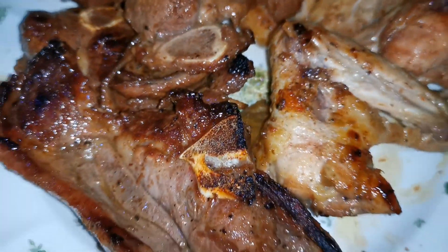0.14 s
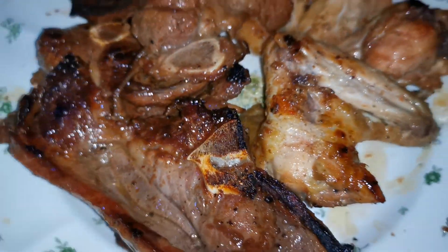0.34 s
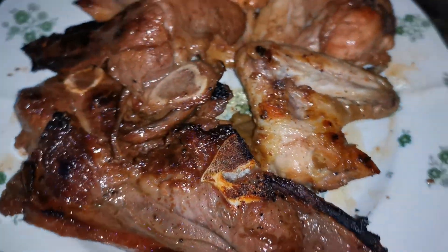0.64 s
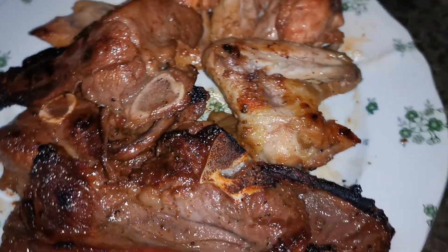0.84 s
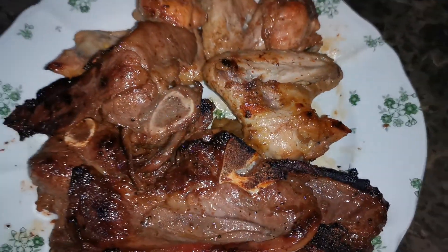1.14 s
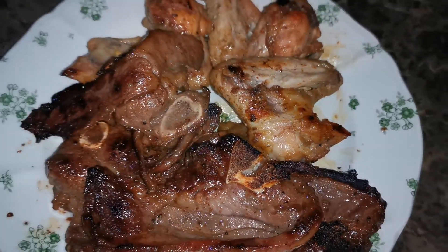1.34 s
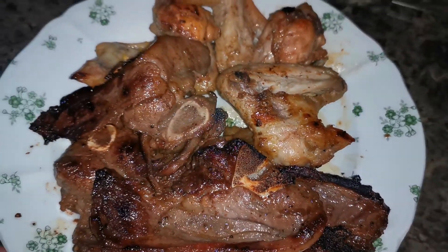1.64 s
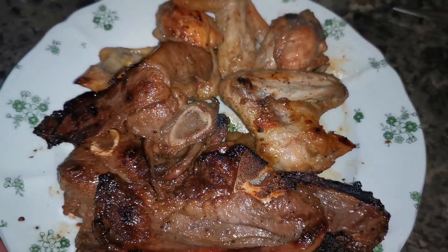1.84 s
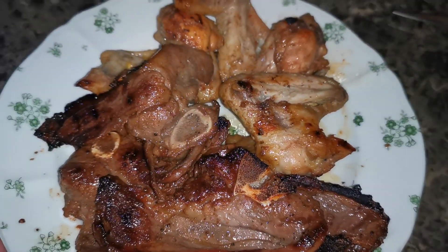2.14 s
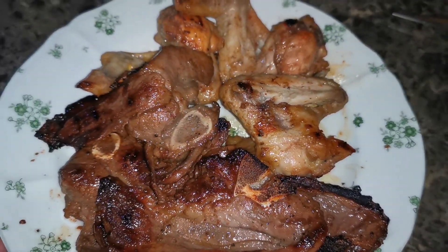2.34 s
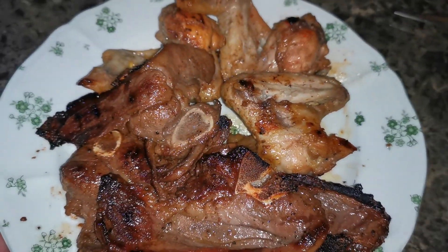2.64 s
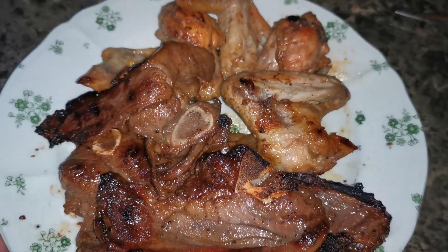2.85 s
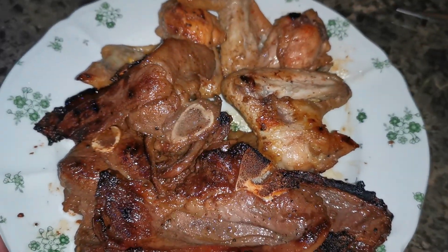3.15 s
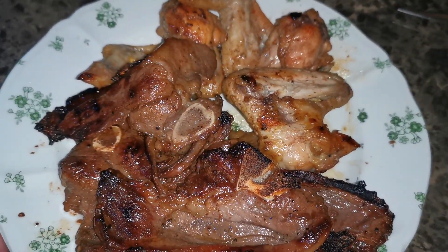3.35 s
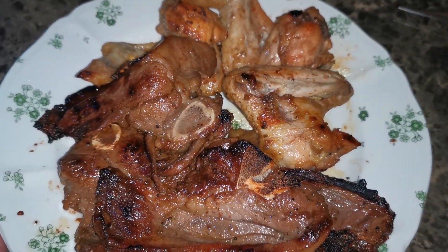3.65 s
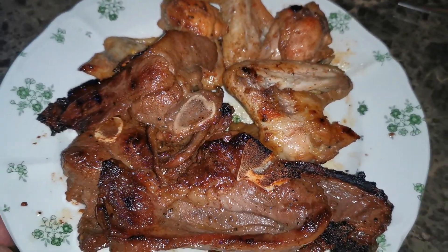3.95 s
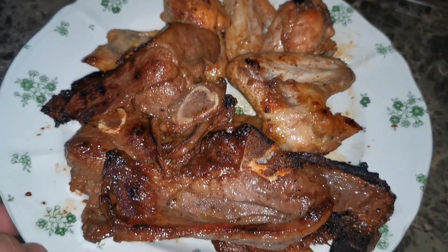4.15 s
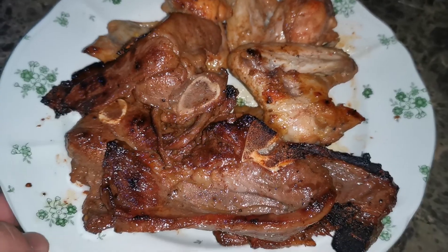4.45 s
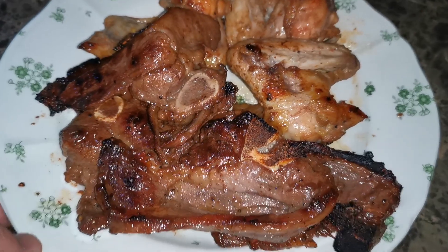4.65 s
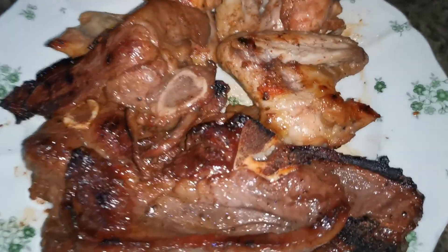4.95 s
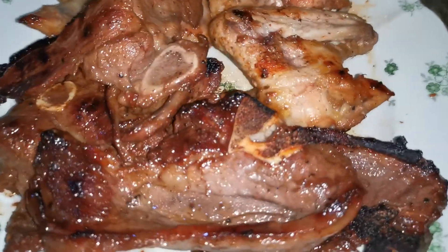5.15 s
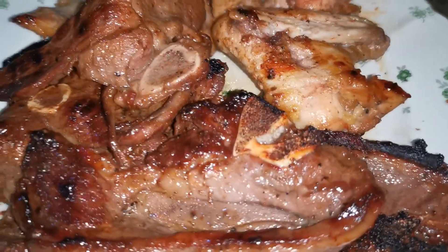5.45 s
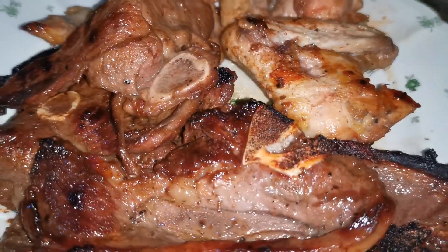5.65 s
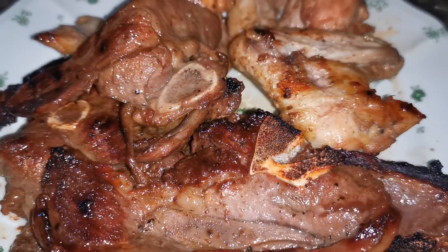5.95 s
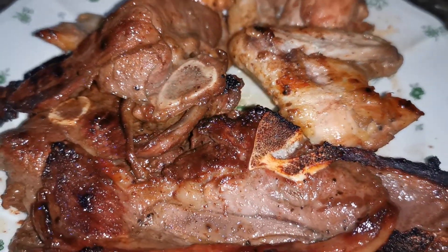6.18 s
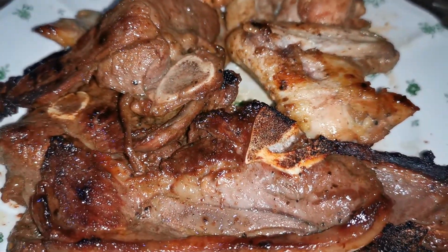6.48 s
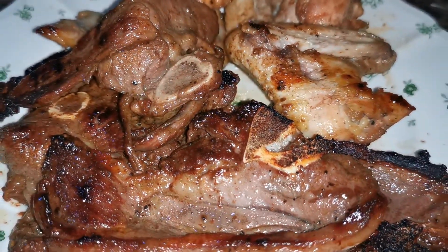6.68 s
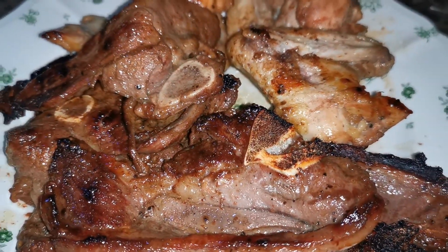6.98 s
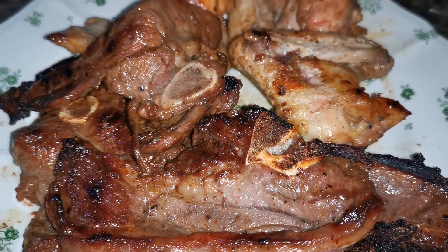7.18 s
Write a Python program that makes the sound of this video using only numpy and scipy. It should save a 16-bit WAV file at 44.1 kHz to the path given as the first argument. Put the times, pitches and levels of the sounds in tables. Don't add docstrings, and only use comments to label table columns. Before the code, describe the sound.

A low, steady fan-motor hum fills a hard kitchen from start to finish, fluttering about thirteen times a second. Underneath, the housing rumbles; above it, moving air rustles, with a faint wavering whistle at the start and again near 2.3 and 3.8 seconds. Hot fat gives a thin, quiet hiss that gradually fades, its brightest part first. Small dry spits tick from the beginning, with a clear one at 1.2 seconds and a roomier pop at 1.8. A little cluster follows around 2.5, then the strongest snap at 3.1, and more crisp ticks from 3.9 to 4.5. After 5 seconds only a few faint ticks remain. The handheld stereo microphone draws back in the first second, then moves close to the plate around 5.4, slightly recolouring the air noise, and stays there until the end at about 7.3 seconds, hum continuing.

```python
import sys
import numpy as np
from scipy import signal
from scipy.fft import rfft, irfft, next_fast_len
from scipy.io import wavfile
from scipy.ndimage import uniform_filter1d

SR = 44100
rng = np.random.default_rng(int(sys.argv[2]) if len(sys.argv) > 2 else 0)


def materialize(psi):
    bounded = np.clip(np.atleast_2d(psi).T, -1, 1)
    quanta = np.round(bounded * 32767).astype(np.int16)
    wavfile.write(sys.argv[1], SR, quanta)


def elevation(decibels):
    levels = np.asarray(decibels, float)
    return 10 ** (levels / 20)


N = 322791
T = np.arange(N) / SR
GRID = next_fast_len(N + 8192)
HZ = np.maximum(np.arange(GRID // 2 + 1) * SR / GRID, 1)
RIGHT_LAG_S = 0.00046
TOP_HZ = 15750

# (pitch_hz, left_db_per_hz, right_db_per_hz)
PORT_COLOUR = [(3220, -103, -91), (4290, -106, -93.5), (4740, -106, -100), (5940, -111, -103),
               (6760, -111, -98), (7900, -110, -99), (8100, -109, -106), (10000, -103, -110),
               (10340, -103, -113), (10500, -100, -108), (11400, -104, -104), (12600, -108, -99),
               (14000, -108, -101), (17200, -112, -116)]


def at_hz(rows):
    hz, *columns = np.transpose(rows)
    return np.array([np.interp(np.log(HZ), np.log(hz), column) for column in columns])


def band(spectra, low_hz, high_hz):
    return spectra * (HZ >= low_hz) * (HZ < high_hz)


def to_sound(spectra):
    return irfft(spectra, GRID)[:, :N]


def drift(rate_hz):
    draws = rng.standard_normal(int(N / SR * 40) + 40)
    memory = np.exp(-2 * np.pi * rate_hz / 40)
    slow = signal.lfilter([1], [1, -memory], draws)[38:]
    return np.interp(T * 40, np.arange(len(slow)), slow / slow.std())


def bump(middle_s, length_s):
    return np.cos(np.pi / 2 * np.clip((T - middle_s) / length_s, -1, 1)) ** 2


def port_noise():
    # (pitch_hz, likeness 0-1)
    likeness = [(25, 0.5), (100, 1), (300, 0.94), (600, 0.52), (900, 0.27), (2000, 0.82), (3000, 0.37),
                (8000, 0.02), (15000, 0)]
    shared, left, right = rfft(rng.standard_normal((3, GRID))) * np.sqrt(SR / 2)
    alike = np.clip(at_hz(likeness)[0], 0, 1)
    lagging_hz = np.maximum(HZ - 600, 0)
    late = np.exp(-2j * np.pi * lagging_hz * RIGHT_LAG_S)
    shared_pair = shared * [np.ones_like(late), late]
    return np.sqrt(alike) * shared_pair + np.sqrt(1 - alike) * np.array([left, right])


def hum():
    # (time_s, level_db)
    hum_levels = [(0.0, -33.5), (0.06, -31), (1.85, -32.5), (2.02, -30.5), (2.28, -31.5), (3.57, -32.5),
                  (3.69, -30.5), (4.06, -31.5), (4.14, -32.5), (6.38, -31.5), (6.73, -33), (6.83, -31.5),
                  (7.26, -32.5), (7.32, -37)]
    # (pitch_hz, level_db)
    motor_tones = [
        (41.48, -67),
        (48.6, -62),
        (52.1, -69),
        (104.04, -56),
        (300.1, -71),
    ]
    hum_hz, rotor_hz = 100.03, 13.01
    swell, sway = 0.125, 0.5
    balance_db = -0.9
    t = T - [[0.000195], [0]]
    turn = 2 * np.pi * rotor_hz * t + 1.8
    cycle = 2 * np.pi * hum_hz * t
    tone = (1 + swell * np.cos(turn)) * np.cos(cycle)
    tone = tone - sway * np.cos(turn + 0.65) * np.sin(cycle)
    strength_db = np.interp(T, *np.transpose(hum_levels))
    tone = elevation(uniform_filter1d(strength_db, size=SR // 12)) * tone
    for pitch_hz, level_db in motor_tones:
        wavering = elevation(level_db + 0.39 * drift(0.34))
        tone = tone + wavering * np.sin(2 * np.pi * pitch_hz * t)
    return np.sqrt(2) * tone * elevation([[balance_db / 2], [-balance_db / 2]])


def spits():
    # (start_s, peak_db, strongest_hz, fall_db_per_octave)
    near_spits = [(.168, -38, 14500, 8), (.187, -37, 14000, 18), (0.327, -31.5, 10000, 17),
                  (.6818, -39, 10000, 20), (.7557, -45, 12700, 18), (.8051, -42, 13000, 22),
                  (.9676, -29.5, 9500, 16.5), (1.1518, -51, 9700, 1), (1.2314, -23, 13300, 15.5),
                  (2.423, -36, 13500, 12.5), (2.499, -34.5, 10000, 11), (2.5593, -36.5, 8900, 17),
                  (3.0696, -39, 10000, 12), (3.105, -17.5, 10400, 24), (3.3716, -38, 14100, 22),
                  (3.4012, -35, 13700, 17), (3.94, -29.5, 7240, 12), (4.2467, -45, 14500, 9),
                  (4.3723, -25.5, 8250, 14), (4.372, -37.5, 3300, 13), (4.455, -36.5, 9200, 13),
                  (4.996, -40.5, 14000, 5), (3.1043, -17.5, 7940, 46), (3.106, -27.5, 5560, 40),
                  (3.911, -42, 3500, 10), (5.965, -46, 4000, 23)]
    # (start_s, peak_db, strongest_hz, fall_db_per_octave)
    far_spits = [(0.555, -42, 11000, 10), (.652, -36.5, 9800, 25), (1.0363, -41.5, 14700, 23),
                 (1.8084, -24.5, 8660, 59), (1.809, -35.5, 11300, 23), (1.8093, -33.5, 3000, 36),
                 (1.81, -40, 5400, 45), (1.9095, -43, 13000, 6), (5.963, -52, 9000, 4.5),
                 (6.0711, -50, 12600, 15), (6.403, -51, 13000, 7), (3.14, -40.5, 9500, 10),
                 (3.32, -48, 10000, 2.5), (3.535, -44.5, 13000, 7), (3.6916, -46.5, 11100, 7.5),
                 (3.9097, -37, 7300, 12.5), (4.415, -42, 9250, 11), (5.5235, -39.5, 13000, 7),
                 (6.534, -53, 10400, 8)]
    near_tail_db, far_tail_db = -16.5, -5.5
    rise_s, burst_s, gather_s = 0.001, 0.0017, 0.0009
    room_t60_s, treble_t60_s = 0.39, 0.25
    length, lag = 16384, round(RIGHT_LAG_S * SR)
    t = np.arange(length) / SR
    out = np.zeros((2, N + length + lag))
    hz = np.maximum(np.arange(length // 2 + 1) * SR / length, 1)
    ports = elevation([np.interp(hz, HZ, side) + 101.9 for side in at_hz(PORT_COLOUR)]) * (hz < TOP_HZ)
    treble = np.clip(np.log2(hz / 7000), 0, 1)
    early_echo = elevation(-3) * np.exp(-2j * np.pi * hz * 0.0029)
    gather = 1 - np.exp(-t / gather_s)
    burst_shape = (1 - np.exp(-t / rise_s)) * np.exp(-t / burst_s)
    fade_out = np.clip(4 - 4 * t / t[-1], 0, 1) ** 2

    rows = [(*row, near_tail_db) for row in near_spits] + [(*row, far_tail_db) for row in far_spits]
    for start_s, peak_db, strongest_hz, fall_db, tail_db in rows:
        octaves = np.log2(hz / strongest_hz)
        colour = elevation(fall_db * np.minimum(octaves, -1.36 * octaves) + 8.5)
        burst = irfft(rfft(rng.standard_normal(length)) * colour)
        burst = rfft(burst * burst_shape)
        spread_db = 2.5 * np.minimum(rng.exponential(1, (2, length)), 4)
        echoes = rng.standard_normal((2, length)) * elevation(spread_db - 21) * gather
        room = rfft(echoes * elevation(-60 * t / room_t60_s)) * (1 - treble)
        room = room + rfft(echoes * elevation(-60 * t / treble_t60_s)) * treble
        tail = elevation(tail_db + 12) * colour * room
        pop = elevation(peak_db) * irfft(ports * (burst * (1 + early_echo) + tail)) * fade_out
        i = round(start_s * SR)
        out[0, i:i + length] += pop[0]
        out[1, i + lag:i + lag + length] += pop[1]
    return out[:, :N]


def hiss(noise):
    split_hz = 6500
    low_db = 0.23 - 0.43 * T
    high_db = 0.6 - 0.8 * T
    spectra = band(noise, 3200, TOP_HZ) * elevation(at_hz(PORT_COLOUR))
    low = to_sound(spectra * (HZ < split_hz))
    high = to_sound(spectra * (HZ >= split_hz))
    flicker = elevation(1.2 * drift(18))
    return flicker * (elevation(low_db) * low + elevation(high_db) * high)


def resonant():
    # (pitch_hz, width_hz, far_db, near_db)
    resonances = [(156, 1.9, 3.5, 3), (188.4, 2.2, 4, 4), (446, 12, 6, 8), (522, 18, -10, 8),
                  (626, 36, -3, 6), (690, 20, 4, 5.5), (7850, 150, 0, 2), (945, 11, 8.5, 6),
                  (1183, 28, -1, 0), (1270, 19, -2.5, 6), (1734, 28, 8, 6.5), (1790, 6.7, 5, 2),
                  (1910, 53, 4, -4.5), (2163, 25, 3.5, 0), (2568, 21, 6, 6), (2673, 32, 5, -3)]
    far_db, near_db = 0, 0
    for pitch_hz, width_hz, far_peak_db, near_peak_db in resonances:
        peak = 1 / (1 + (2 * (HZ - pitch_hz) / width_hz) ** 2)
        far_db = far_db + far_peak_db * peak
        near_db = near_db + near_peak_db * peak
    return elevation(far_db), elevation(near_db)


def fan(noise, near):
    # (pitch_hz, level_db_per_hz)
    rumble_colour = [(20, -69), (30, -79.5), (60, -73.5), (78, -74), (98, -62.5), (130, -71), (155, -59.5),
                     (190, -63.5), (205, -65.5), (230, -71.5), (260, -79.5), (295, -70.5), (330, -73),
                     (400, -84.5)]
    # (pitch_hz, left_far_db_per_hz, right_far_db_per_hz, left_near_db_per_hz, right_near_db_per_hz)
    air_colour = [(400, -83.5, -81, -87, -74.5), (490, -80.5, -80, -76.5, -81), (593, -90, -83.5, -85, -81),
                  (796, -92, -91.5, -95, -90.5), (880, -91.5, -81, -100.5, -85.5),
                  (1180, -90.5, -99, -85.5, -93), (1400, -88, -82, -85.5, -82.5),
                  (1576, -89, -85.5, -88, -85), (1786, -109.5, -84.5, -100, -86),
                  (2030, -92, -83.5, -93.5, -85), (2470, -111.5, -81, -105, -85),
                  (2698, -92, -84, -91, -79), (2764, -101, -86.5, -101, -84),
                  (3210, -103, -90.5, -105, -95)]
    far_peaks, near_peaks = resonant()
    rumble_gain = elevation(at_hz(rumble_colour) + [[-1.2], [0]])
    rumble = to_sound(band(noise, 15, 400) * far_peaks * rumble_gain)
    colour = elevation(at_hz(air_colour))
    air_noise = band(noise, 400, 3200)
    far_air = to_sound(air_noise * colour[:2] * far_peaks)
    near_air = to_sound(air_noise * colour[2:] * near_peaks)
    air = (1 - near) * elevation(0.5) * far_air + near * elevation(0.4) * near_air
    return elevation(0.8 * drift(0.44)) * rumble + elevation(0.71 * drift(5.1)) * air


def whistles(noise):
    # (pitch_hz, width_hz)
    whistle_pitches = [
        (1342, 9.0),
        (1428, 8.0),
    ]
    # (middle_s, length_s, whistle 0 lower or 1 upper, level_db)
    gusts = [
        (0, 0.52, 0, -65),
        (1.3, 0.87, 0, -67),
        (3.8, 0.63, 0, -61),
        (7.15, 0.19, 0, -60),
        (0, 0.83, 1, -58.5),
        (2.314, 0.54, 1, -56),
    ]
    out = 0
    for k, (pitch_hz, width_hz) in enumerate(whistle_pitches):
        tone = to_sound(noise / (1 + (2 * (HZ - pitch_hz) / width_hz) ** 2))
        strength = elevation(-72.5)
        for middle_s, length_s, which, level_db in gusts:
            if round(which) == k:
                strength = strength + elevation(level_db) * bump(middle_s, length_s)
        out = out + strength * tone / tone.std()
    return out * elevation([[-7.5], [0]])


def swells():
    # (middle_s, length_s, pitch_hz, width_hz, right_level_db)
    standing_waves = [(0.24, 2.2, 1200, 486, -57.5), (0.38, 0.6, 309, 55.56, -50),
                      (.85, 0.61, 4020, 528, -62.5), (1.68, 1, 790, 540, -55), (2, 0.34, 2880, 400, -58.5),
                      (4.91, 0.59, 868, 118.8, -55), (4.8, 0.77, 4920, 400, -65.5),
                      (5.516, 0.14, 282, 110, -47.5), (6.5, 0.26, 280, 102, -51.5),
                      (3.444, 0.11, 186, 50, -38.5), (5.25, 0.51, 2620, 500, -58),
                      (5.66, 3.2, 696, 51.85, -66), (7.1, 0.26, 319, 52, -49)]
    # (pitch_hz, shade_db)
    left_shade = [(320, -5), (800, -16), (1200, -3), (2900, -17)]
    out = np.zeros((2, N))
    for middle_s, length_s, pitch_hz, width_hz, level_db in standing_waves:
        edges_hz = [pitch_hz - width_hz / 2, pitch_hz + width_hz / 2]
        sos = signal.butter(2, edges_hz, "band", fs=SR, output="sos")
        white = rng.standard_normal((3, N))
        during = np.abs(T - middle_s) < length_s
        own_share = np.clip(pitch_hz / 2500, 0, 3)
        noise = signal.sosfilt(sos, white[0, during] + own_share * white[1:, during])
        shade_db = np.interp(pitch_hz, *np.transpose(left_shade))
        gain = elevation([[level_db + shade_db], [level_db]])
        out[:, during] += gain * bump(middle_s, length_s)[during] * noise / noise.std()
    return out


def scene():
    # (time_s, nearness to the plate 0-1)
    hand = [
        (0, 0.7),
        (.8, 0.03),
        (2, 0.23),
        (3, 0.08),
        (4, 0.24),
        (4.6, 0.14),
        (5.1, 0.54),
        (5.4, .93),
        (7.32, 0.97),
    ]
    near = np.clip(np.interp(T, *np.transpose(hand)), 0, 1)
    noise = port_noise()
    return hum() + spits() + hiss(noise) + fan(noise, near) + whistles(noise) + swells()


def low_pass(x):
    return signal.sosfilt(signal.butter(12, 15960, fs=SR, output="sos"), x)


def record(dry):
    return low_pass(dry)


dry = scene()
out = record(dry)
materialize(out)
```